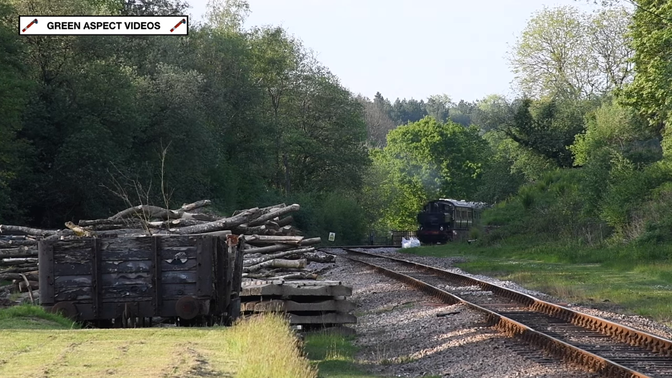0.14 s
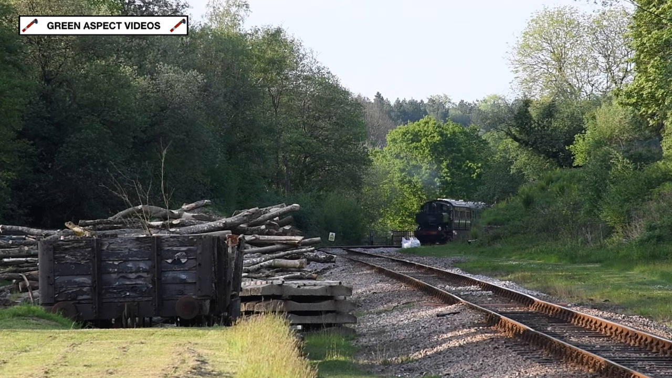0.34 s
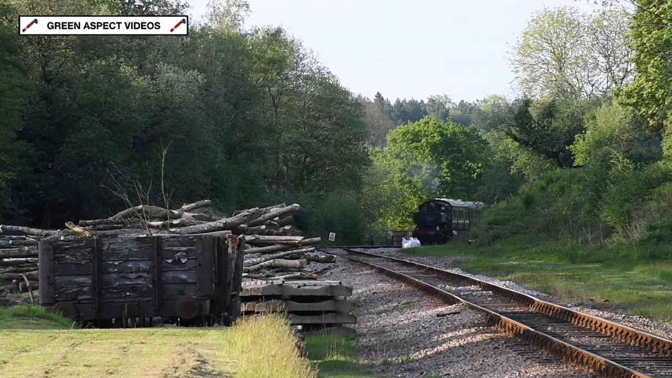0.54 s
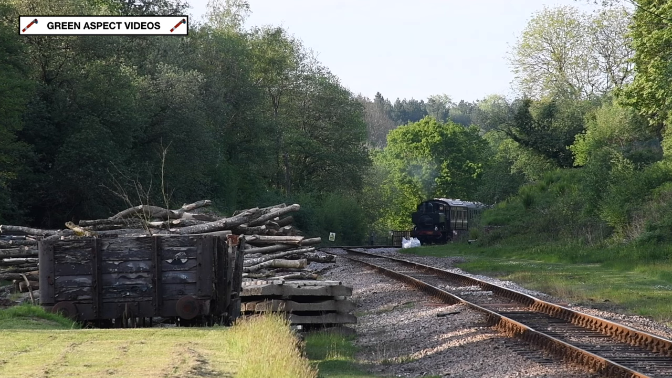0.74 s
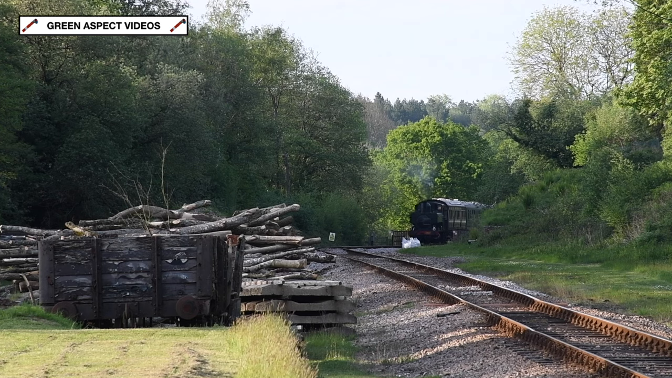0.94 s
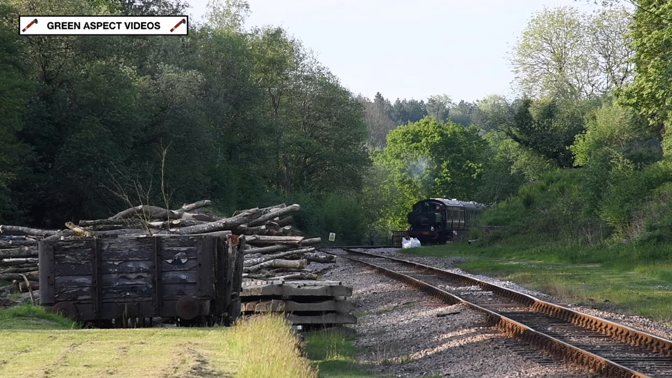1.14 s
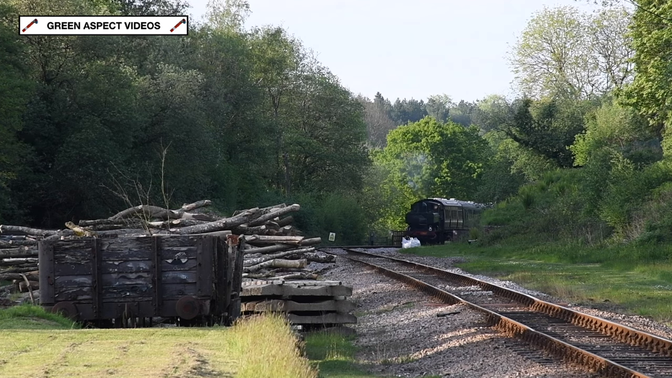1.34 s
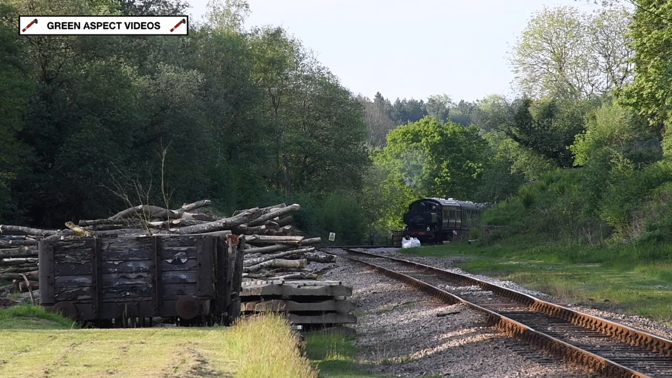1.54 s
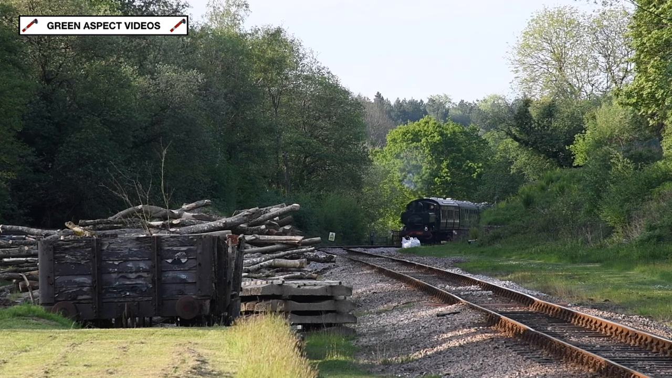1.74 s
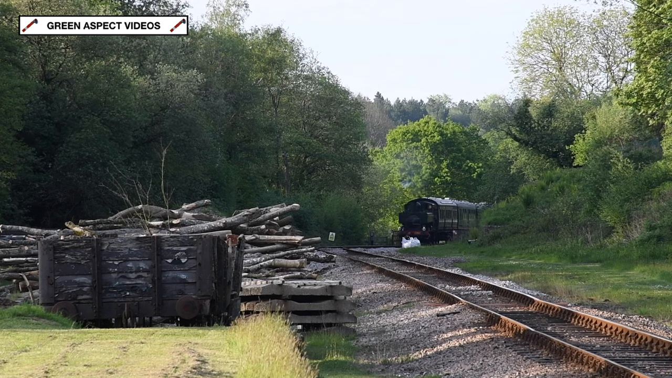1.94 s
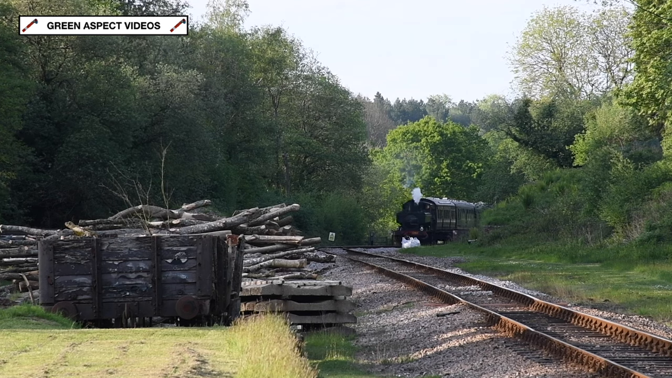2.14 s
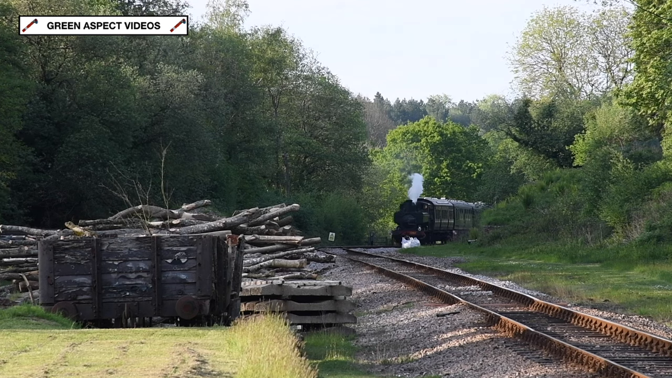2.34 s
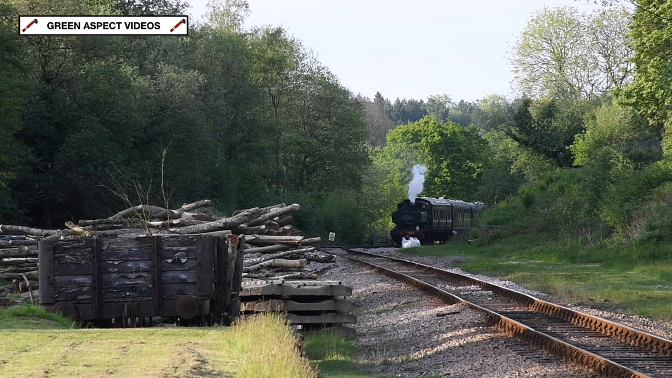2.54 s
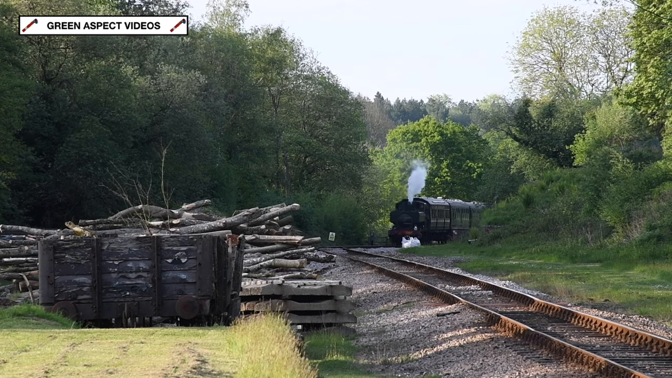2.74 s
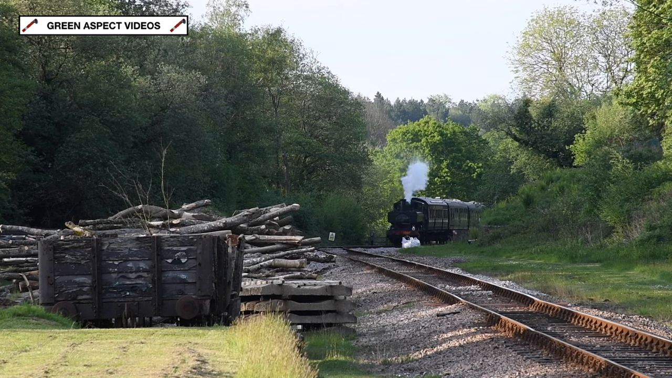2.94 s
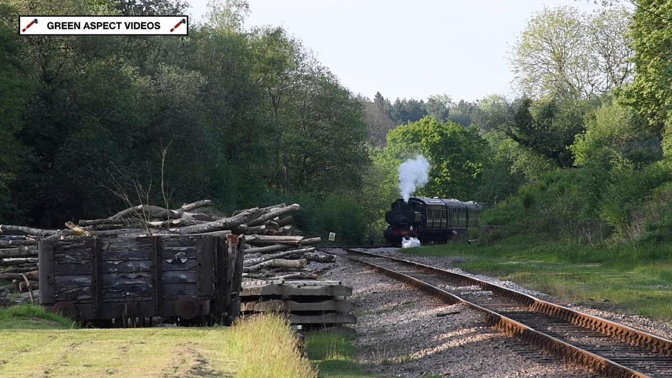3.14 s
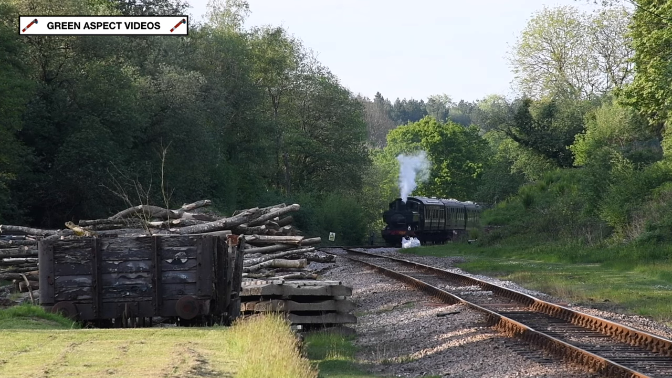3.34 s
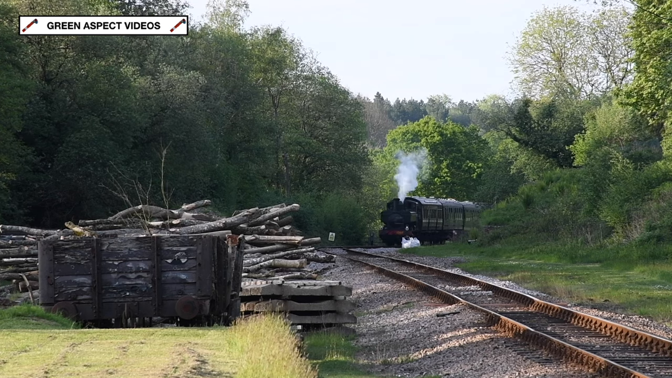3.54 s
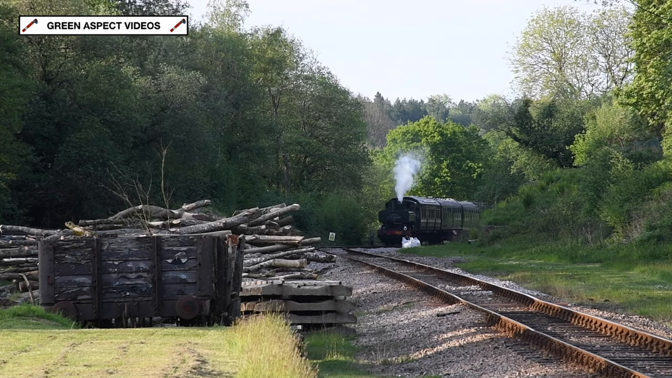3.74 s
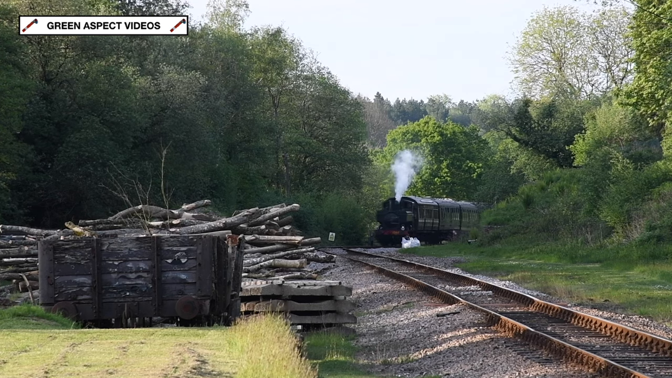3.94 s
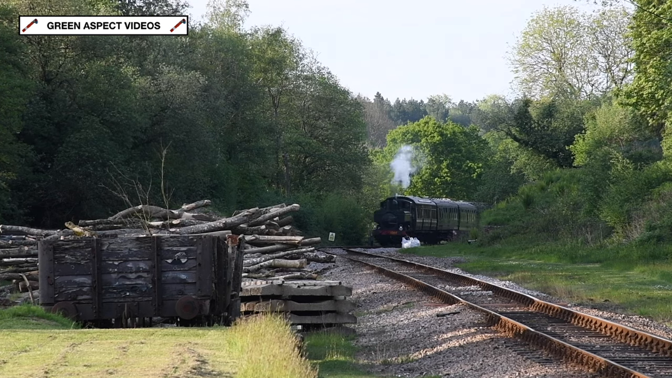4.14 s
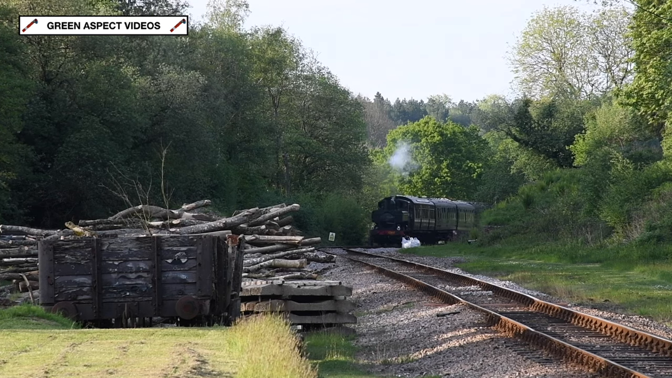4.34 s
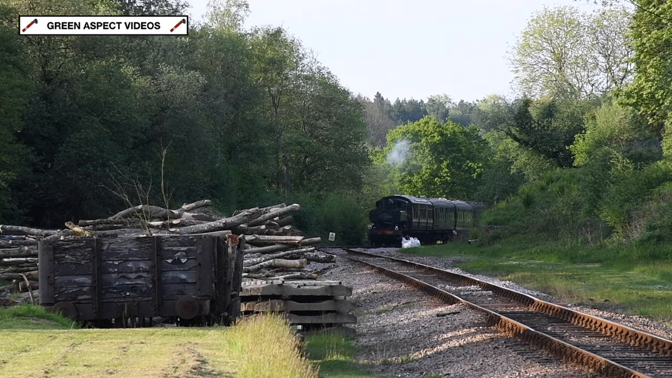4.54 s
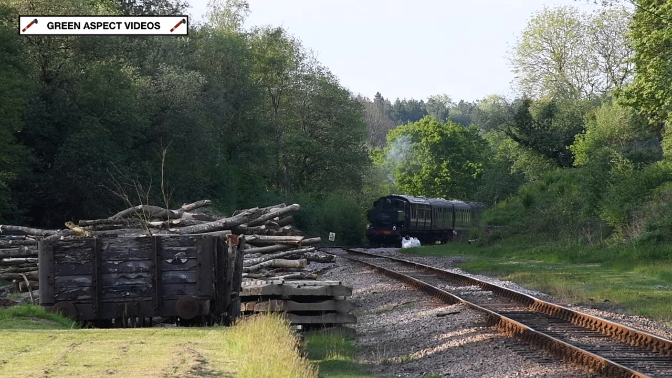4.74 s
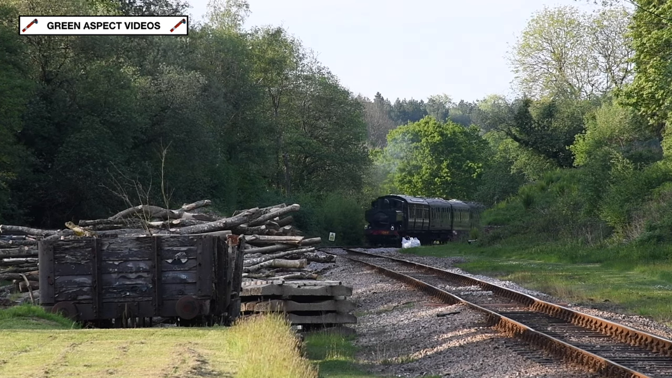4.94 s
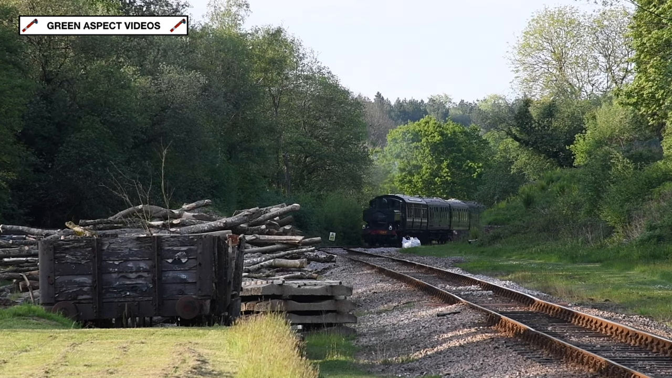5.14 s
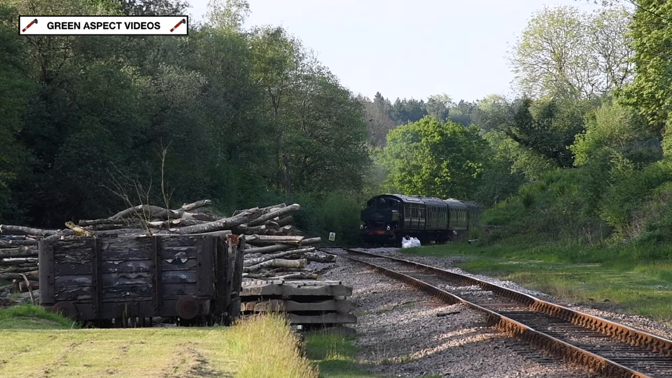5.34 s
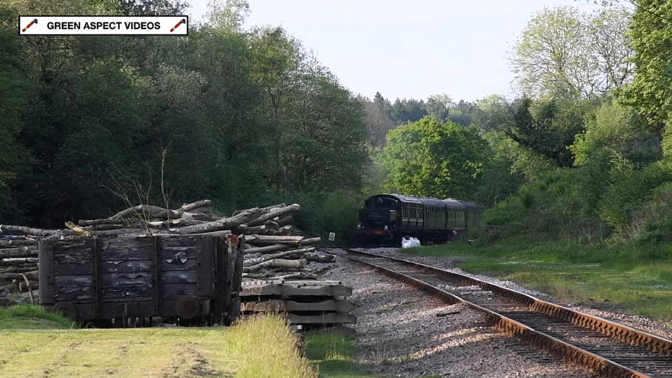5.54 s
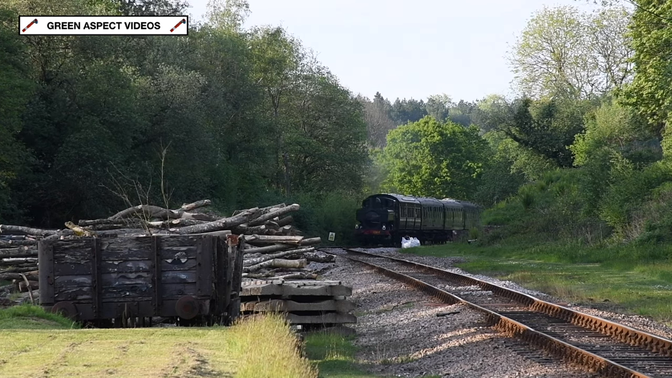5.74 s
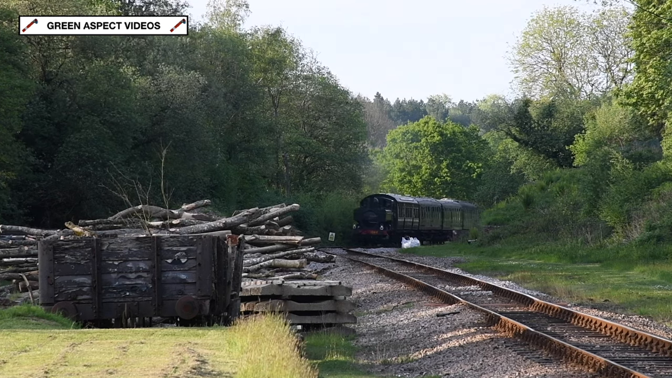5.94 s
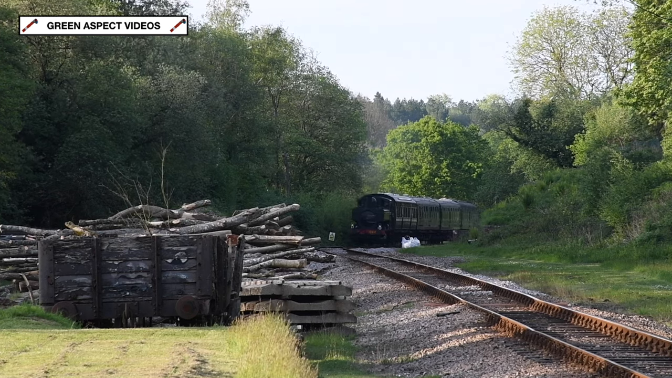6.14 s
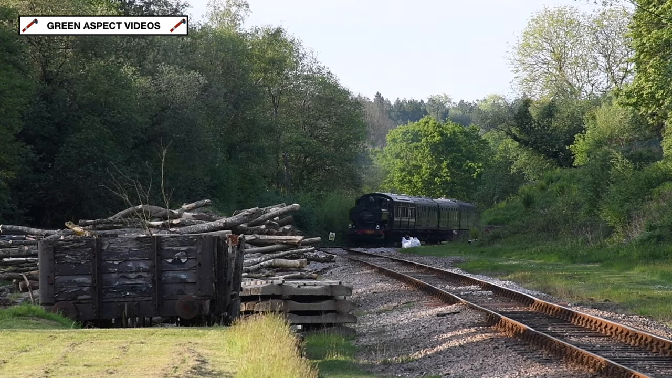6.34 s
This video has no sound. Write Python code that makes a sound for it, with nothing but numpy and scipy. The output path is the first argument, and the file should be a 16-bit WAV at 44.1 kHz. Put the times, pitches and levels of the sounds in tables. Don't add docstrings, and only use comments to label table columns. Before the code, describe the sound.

Small birds chip and peep and a larger one flutes over the muted beat and rumble of a far-off steam locomotive. Then one strong whistle blast dominates, several tones mixed with rushing steam, unsteady in pitch and briefly flaring higher near its start. After the valve shuts, the ringing tone hangs among the trees, answering in uneven swells as it decays. Soft train noise, a little leaking steam and microphone hiss remain in the open air.

```python
import sys
import numpy as np
from scipy import signal
from scipy.fft import rfft, irfft, next_fast_len
from scipy.io import wavfile

SR = 44100
rng = np.random.default_rng(int(sys.argv[2]) if len(sys.argv) > 2 else 0)


def put_to_file(sound):
    columns = np.atleast_2d(sound).T
    safe = np.clip(columns, -1, 1)
    whole_steps = np.round(safe * 32767)
    wavfile.write(sys.argv[1], SR, whole_steps.astype(np.int16))


def volts_from_db(level):
    exponent = np.asarray(level, float) / 20
    return 10 ** exponent


N = 285961
OVERBLOW_S = 3.222


def at_hz(points, hz):
    points_hz, values = np.transpose(points)
    return np.interp(np.log(hz + 1), np.log(points_hz), values)


def rms_one(x):
    return x / np.sqrt(np.mean(np.abs(x) ** 2) + 1e-20)


def coloured(spectrum):
    size = next_fast_len(N)
    hz = np.arange(size // 2 + 1) * SR / size
    shaped = rfft(rng.standard_normal(size)) * volts_from_db(at_hz(spectrum, hz))
    return rms_one(irfft(shaped, size)[:N])


def wander(width_hz):
    r = np.exp(-2 * np.pi * width_hz / SR)
    white = rng.standard_normal(N) + 1j * rng.standard_normal(N)
    return rms_one(signal.lfilter([1], [1, -2 * r, r * r], white))


def bump(at, half_s):
    out = np.zeros(N)
    first, last = int((at - 4 * half_s) * SR), int((at + 4 * half_s) * SR)
    near = np.arange(max(first, 0), min(last, N))
    out[near] = np.exp(-((near / SR - at) / half_s) ** 2)
    return out


def train():
    # frequency in Hz, level in dB per Hz.
    roll_colour = [(40, -37), (90, -12), (140, -0.5), (190, -7.5), (370, -5), (510, -5.5), (650, -10.5),
                   (980, -8.5), (1630, -13.5), (2390, -17.5), (3120, -24.5), (8000, -37), (12000, -42)]
    # frequency in Hz, level in dB per Hz.
    puff_colour = [(60, -30.5), (150, 5), (400, 5.5), (1200, -2.5), (2500, -13.5), (5000, -30.5),
                   (9000, -73.5)]
    # frequency in Hz, level in dB per Hz.
    thud_colour = [(20, -45), (35, -23.5), (55, -6.5), (78, 1), (120, -7.5), (170, -26.5), (300, -59)]
    # frequency in Hz, level in dB per Hz.
    leak_colour = [(300, -13), (800, 13), (1300, 7.5), (2500, -0.5), (4000, -9), (8000, -49)]
    # time in seconds, puff level in dB, thud level in dB.
    beats = [(.18, -56, -57), (.39, -58, -60), (0.571, -49, -54), (.76, -66, -59), (.94, -50.5, -70.5),
             (1.122, -64.5, -50.5), (1.323, -49.5, -52.5), (1.522, -52, -67), (1.71, -51.5, -58),
             (1.89, -54.5, -75), (2.089, -52.5, -51), (2.25, -52, -56), (2.44, -52.5, -52),
             (2.629, -74.5, -72), (2.862, -48.5, -60.5), (3.1, -58, -55), (3.36, -62.5, -54.5),
             (3.6, -63, -61), (3.85, -70, -63.5), (4.249, -61, -54.5), (4.6, -55, -63.5),
             (4.8, -55.5, -56.5), (4.97, -62, -60), (5.26, -56, -52.5), (5.448, -67, -57),
             (5.649, -115, -66), (5.839, -52, -63), (6.06, -75, -60), (6.231, -53, -61), (6.431, -60, -95)]
    roll = volts_from_db(-51.5 + 0.45 * wander(3.2).real) * coloured(roll_colour)
    puffs = sum(volts_from_db(puff_db - 1.0) * bump(at, 0.041) for at, puff_db, _ in beats)
    thuds = sum(volts_from_db(thud_db) * bump(at, 0.057) for at, _, thud_db in beats)
    rumble = (volts_from_db(-59) + thuds) * coloured(thud_colour)
    leak = volts_from_db(-52.5) * bump(5.9, 0.46) * coloured(leak_colour)
    return roll + rumble + puffs * coloured(puff_colour) + leak


def amplifier_hiss():
    # frequency in Hz, level in dB per Hz.
    hiss_colour = [(35, -37), (60, -16.5), (103, -1.5), (396, -5), (760, -8.5), (1270, -15.5), (2670, -6.5),
                   (5770, -7.5), (15700, -6.5)]
    return volts_from_db(-56.5) * coloured(hiss_colour)


def birds():
    # start in seconds, start pitch in Hz, level in dB.
    chips = [(.153, 3600, -59.5), (.345, 4100, -59), (.42, 3900, -64), (.5, 4470, -64), (.7, 3037, -57.5),
             (.795, 3570, -55), (1.012, 3450, -61), (1.195, 3400, -63), (1.27, 3500, -62),
             (1.33, 3300, -64), (1.386, 3384, -61.5), (1.52, 3380, -66), (1.59, 3310, -69),
             (1.795, 3213, -61), (1.88, 2900, -61)]
    # start in seconds, pitch in Hz, level in dB.
    peeps = [
        (.545, 5300, -66),
        (.86, 5450, -63),
        (.97, 4770, -71),
        (1.06, 6120, -67),
        (1.115, 5380, -65),
        (1.723, 3590, -65),
    ]
    # start in seconds, length in seconds, pitch from in Hz, pitch to in Hz, level in dB.
    song = [
        (0.574, .075, 2500, 2410, -63),
        (0.65, 0.069, 2425, 2415, -56.5),
        (1.51, 0.13, 1950, 1730, -59),
        (1.683, 0.12, 2194, 1680, -56),
        (1.95, .06, 2080, 2150, -58),
        (2.043, 0.17, 2240, 2630, -58),
        (6.192, 0.055, 2003, 1930, -55),
    ]
    notes = []
    for at, hz, db in chips:
        rise = .11 + .015 * (db + 62)
        notes.append((at, .022, hz, hz * (1 + rise), db))
    notes += [(at, .028, hz, hz, db) for at, hz, db in peeps]
    notes += list(song)

    out = np.zeros(N)
    flutter = 1 + .4 * wander(50)
    for at, length_s, from_hz, to_hz, db in notes:
        start, size = int(at * SR), int(length_s * SR)
        turns = np.cumsum(np.linspace(from_hz, to_hz, size)) / SR
        note = np.exp(2j * np.pi * turns) * flutter[start:start + size]
        out[start:start + size] += volts_from_db(db) * np.hanning(size) ** 0.22 * note.real
    return out


def mode(hz, unsteady, width_hz, firmness=0):
    swing = np.sqrt(1 - unsteady) + np.sqrt(unsteady) * wander(width_hz)
    swing = rms_one(swing / (np.abs(swing) + 0.075) ** firmness)
    return np.sqrt(2) * np.real(swing * np.exp(2j * np.pi * np.cumsum(hz) / SR))


def first_mode(since, chill, unsteady, over):
    # time in seconds, change in dB.
    wavers = [(3.07, -3), (3.15, 2), (3.31, 5), (3.389, -2), (3.46, 6), (3.602, -3.5), (3.701, 3.5),
              (3.771, -3.5), (3.81, 6.5), (3.87, -5.5), (3.971, -9), (4.012, 4.5), (4.119, -7),
              (4.179, 5.5), (4.272, -14.5), (4.52, 1), (4.59, 4), (4.623, -14), (4.743, 7)]
    waver_db = sum(db * bump(at, 0.025) for at, db in wavers)
    hz = 857.5 * (1 - .068 * chill) + 8 * since + 1.24 * waver_db
    level_db = -15 - 3.5 * since - 3 * np.exp(-since / 0.13) - 14 * over + waver_db
    return hz, volts_from_db(level_db) * mode(hz, unsteady, width_hz=18.3, firmness=.6)


def third_mode(since, first_hz, unsteady, over):
    # time in seconds, half length in seconds, gain in dB.
    flares = [(3.03, 0.012, 14), (3.169, 0.035, 10.5), (3.244, 0.037, 22), (3.322, 0.033, 7),
              (3.437, 0.027, 0), (3.533, 0.0138, 9.5), (3.601, 0.017, 12), (3.904, 0.069, 11),
              (4.034, 0.044, 10.5), (4.249, 0.12, 6), (4.403, 0.1, 6.5), (4.711, 0.0161, 6),
              (4.828, 0.018, 11.5)]
    flat = .035 * np.exp(-since / 0.2)
    scoop = .11 * np.exp(-since / .025)
    hz = 2593 * (1 - flat - scoop) + 3.0 * 8 * since
    hz += bump(OVERBLOW_S + .025, .055) * (2.985 * first_hz - hz)
    level_db = -36 - 10 * np.exp(-since / 0.037)
    level_db += sum(db * bump(at, half_s) for at, half_s, db in flares)
    share = 2.08 * unsteady * (1 - 0.21 * over)
    return volts_from_db(level_db) * mode(hz, share, width_hz=55, firmness=0.14)


def weak_tones(s, since, roar_db):
    # warm pitch in Hz, width in Hz, dB over the roar at the start, dB over it at the end.
    lesser_tones = [(766.6, 24, -17.5, 7.5), (721.5, 14, -7, -10.5), (1572, 140, -3, -0.5), (1751, 50, -1, 0),
                    (2498, 84, 7, -3.5), (3383, 51, 0, -3), (3540, 22, -12, -8), (4168, 130, -4, 0),
                    (5040, 90, -17, -17.5), (979, 50, 6.5, -13.5)]
    open_for = np.clip(s - 2.96, 0, None)
    cold = np.exp(-open_for / .35)
    out = np.zeros(N)
    for hz, width_hz, start_db, end_db in lesser_tones:
        level_db = roar_db + end_db + (start_db - end_db) * cold
        level_db += 8 * (hz > 4800) * bump(OVERBLOW_S + 0.022, 0.068)
        speaks = 1 - np.exp(-open_for / (hz * 1.6e-5))
        pitch_hz = hz * (1 - .035 * cold + .006 * since)
        out += speaks * volts_from_db(level_db) * mode(pitch_hz, 0.89, width_hz)
    return out


def jet_roar(roar_db):
    # frequency in Hz, level in dB per Hz.
    jet_colour = [(200, -36), (320, -31), (360, -10), (650, -5.5), (1000, 2), (1300, 0), (2000, -4.5),
                  (3000, -8), (4600, -16), (5600, -26.5), (8000, -37), (12000, -67.5)]
    return volts_from_db(roar_db + 4 + 1.5 * wander(17).real) * coloured(jet_colour)


def whistle():
    open_s, shut_s, shutting_s = 2.957, 4.835, 0.045
    s = np.arange(N) / SR
    since = np.clip(s - open_s, 0, shut_s - open_s)
    chill = np.exp(-np.clip(since - 0.0705, 0, None) / .24)
    over = bump(OVERBLOW_S, .04)
    unsteady = 0.46 + (0.26 - 0.46) * chill
    roar_db = -39.5 - 11 * np.exp(-since / 0.11) - 4 * over

    first_hz, bell = first_mode(since, chill, unsteady, over)
    bell += third_mode(since, first_hz, unsteady, over)
    high_pass = signal.butter(4, 3000, "high", fs=SR, output="sos")
    sums = signal.sosfilt(high_pass, bell ** 2)
    bell += weak_tones(s, since, roar_db)

    opening = np.clip((s - open_s) / 0.027, 0, 1)
    closing = np.exp(-(np.clip(s - shut_s, 0, 1) / shutting_s) ** 2)
    return opening * closing * (bell + volts_from_db(-10.5) * sums + jet_roar(roar_db))


def woods(x):
    # frequency in Hz, time to fall 60 dB in seconds.
    echo_t60 = [(400, 4), (700, 6.3), (900, 4.63), (1700, 3), (2000, 2.2), (2640, 4.53), (3300, 2.6),
                (4300, 1.0), (8000, .5)]
    # time in seconds, gain in dB.
    answers = [
        (5.458, 3.5),
        (5.698, 2),
        (5.998, 6.5),
        (6.28, 4.5),
        (6.43, 6.5),
    ]
    s = np.arange(int(3.6 * SR)) / SR
    near = volts_from_db(-47 - 60 * s / 0.93)
    splits_hz = np.geomspace(233, 7147, num=13)
    tail = np.zeros(len(s))
    for low, high in zip(splits_hz, splits_hz[1:]):
        band = signal.butter(2, [low, high], "band", fs=SR, output="sos")
        t60 = at_hz(echo_t60, np.sqrt(low * high))
        far = volts_from_db(-53.5 - 5 * np.log2(low / 800)) * volts_from_db(-60 * s / t60)
        scatter = signal.sosfilt(band, rng.standard_normal(len(s)))
        tail += scatter * (near * volts_from_db(-20 * s / t60) + far)
    tail *= np.clip(s / 0.053, 0, 1)

    back = signal.hilbert(signal.fftconvolve(x, tail)[:N], next_fast_len(N))[:N]
    stir_rad = 1.0 * wander(8).real
    drop_rad = 2 * np.pi * 8 * np.arange(N) / SR
    gain_db = 1.0 + sum(db * bump(at, 0.052) for at, db in answers)
    return volts_from_db(gain_db) * np.real(back * np.exp(1j * (stir_rad - drop_rad)))


def scene():
    rolling, singing = train(), birds()
    blast = whistle()
    front = rolling + singing + volts_from_db(0.5) * blast + woods(blast)
    return np.array([front, front])


def band_limit(x):
    return signal.sosfilt(signal.butter(12, 16790, fs=SR, output="sos"), x)


def record(dry):
    hiss = np.array([amplifier_hiss(), amplifier_hiss()])
    low_pass = signal.ellip(12, .3, 70, 15750, fs=SR, output="sos")
    mix = signal.sosfilt(low_pass, dry + hiss)
    return band_limit(mix)


dry = scene()
out = record(dry)
put_to_file(out)
```